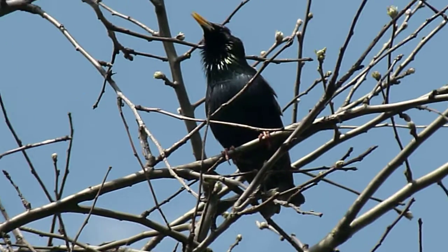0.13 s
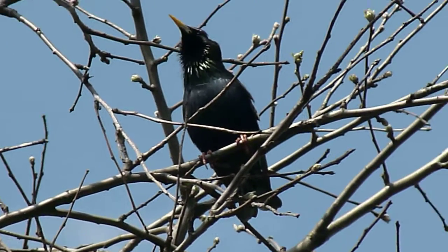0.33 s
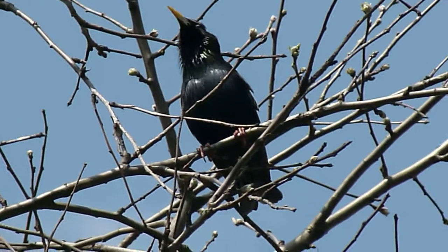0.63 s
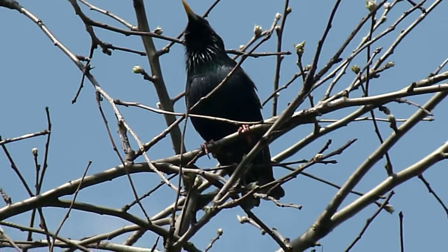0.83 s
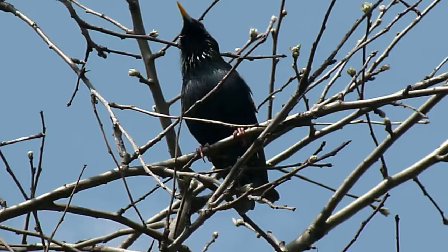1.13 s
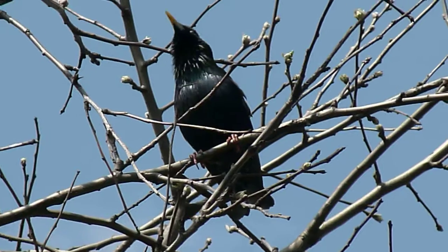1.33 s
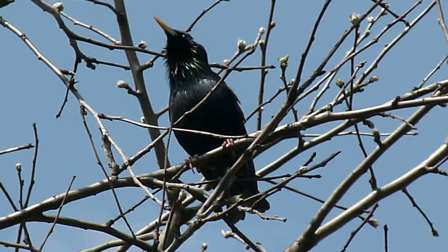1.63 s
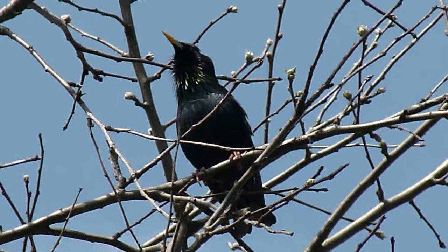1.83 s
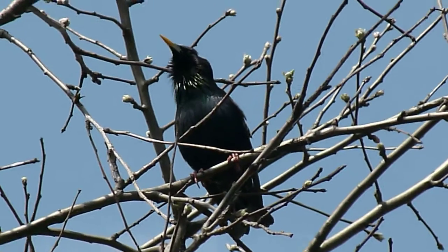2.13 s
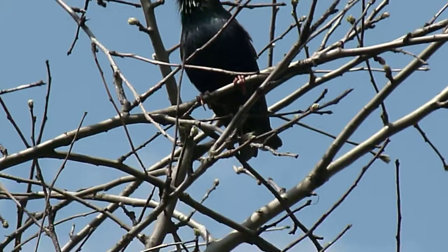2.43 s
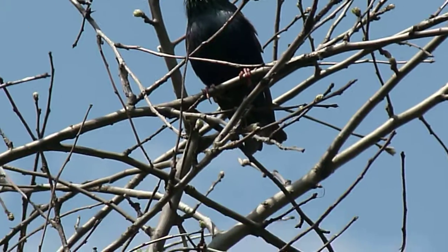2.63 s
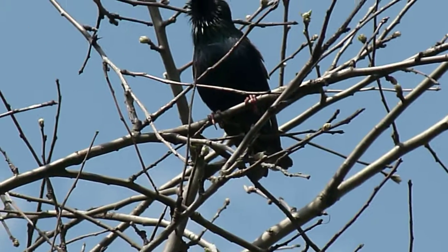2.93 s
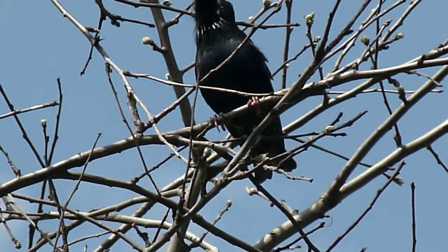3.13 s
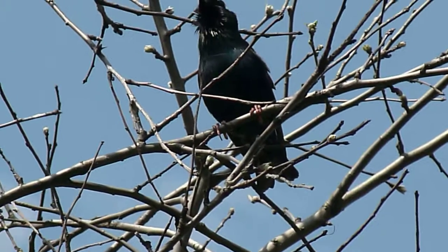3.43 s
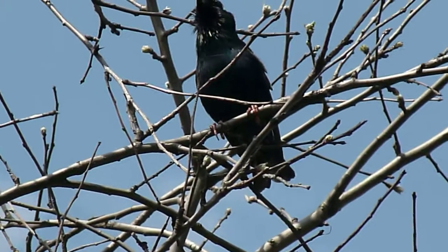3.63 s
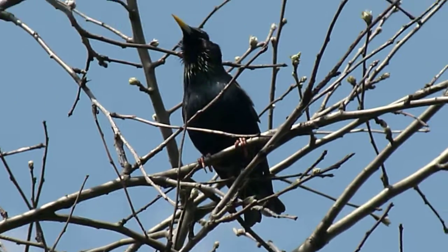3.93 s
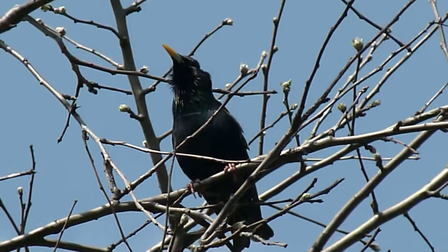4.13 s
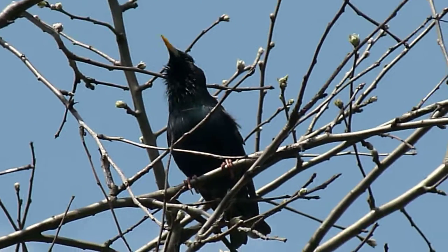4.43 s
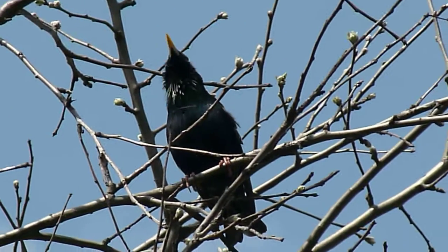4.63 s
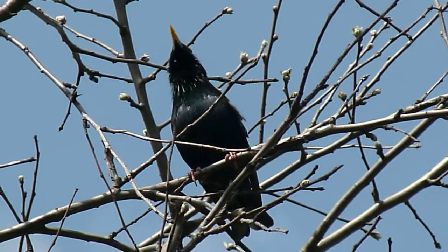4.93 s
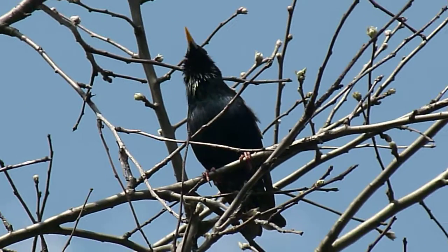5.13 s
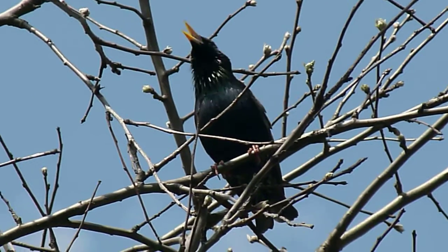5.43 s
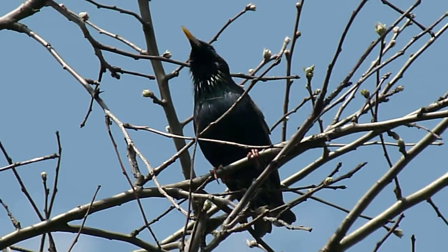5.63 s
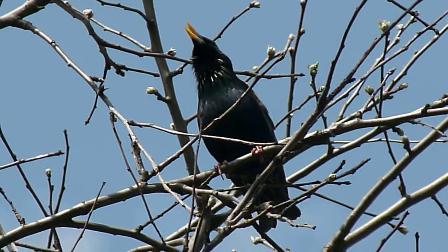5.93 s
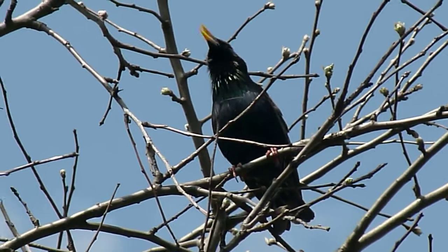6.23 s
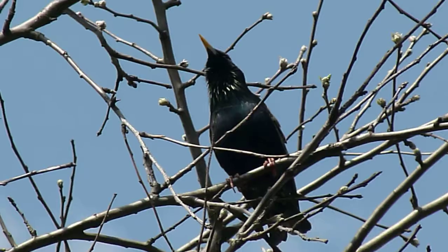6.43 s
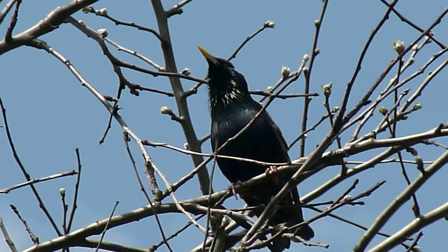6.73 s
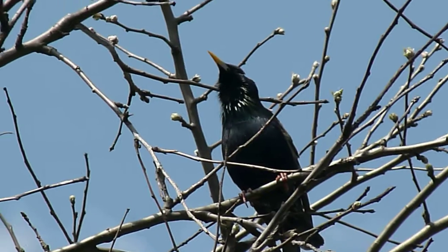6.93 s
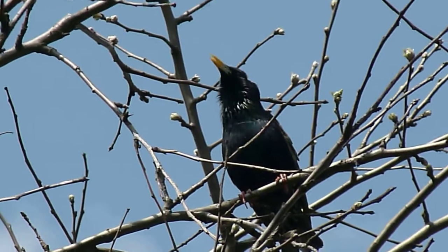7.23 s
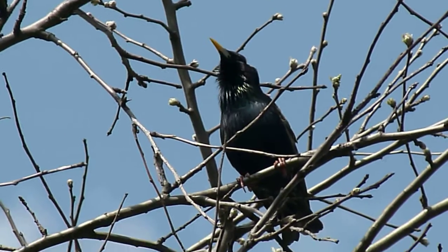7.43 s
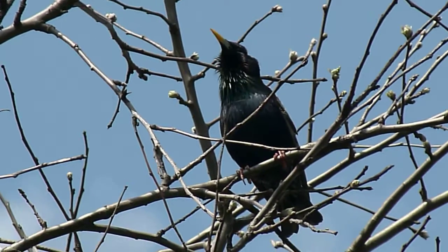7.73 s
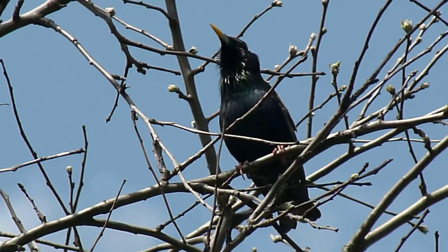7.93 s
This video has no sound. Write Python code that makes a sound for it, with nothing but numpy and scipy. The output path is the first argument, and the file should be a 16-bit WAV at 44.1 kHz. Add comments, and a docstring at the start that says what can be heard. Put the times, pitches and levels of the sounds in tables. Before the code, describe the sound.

Outdoors, a songbird rambles through steep whistles, bill snaps, squeaky warbles and soft rattles, lightly echoing above a low hum and far-off traffic.

```python
"""Far traffic murmurs and a machine hums, filtered noise and a drifting low tone; at once a whistle falls steeply.
It is a starling high in a bare tree, singing with both sides of its voice box: gliding sines make whistles
and trills of short chips, throat-filtered harmonics make reedy squawks, pulses and breath make buzzes.
Bill snaps and throat knocks are decaying tones; nearby walls and scattered houses and trees answer as noise tails.
The small recorder rolls off under 8 kHz and leaves a faint mirror image above."""
import sys
import numpy as np
from scipy import signal
from scipy.fft import rfft, irfft, next_fast_len
from scipy.io import wavfile
from scipy.ndimage import uniform_filter1d, map_coordinates

SR = 44100
rng = np.random.default_rng(int(sys.argv[2]) if len(sys.argv) > 2 else 0)


def wav_record(signal):
    """Record a signal, one row per channel, as 16-bit PCM in the file named by sys.argv[1]."""
    frames = np.transpose(np.atleast_2d(signal))
    bounded = np.clip(frames, -1, 1)
    # unit amplitude maps onto the largest positive 16-bit level
    quanta = np.round(bounded * 32767).astype(np.int16)
    wavfile.write(sys.argv[1], SR, quanta)


N = 357210
MIRROR_HZ = 8000  # edge of the recorder's band
LEAP_S = .014  # time of an upward leap in warbles and droops

# Reed motifs, the vocabulary of the motif list. Each row is a voice: throat resonance in Hz, its width in Hz,
# and a list of points: time from the motif's start in seconds, pitch in Hz, level in dB before the motif's own.
SQUAWK = [(3670, 2750, [(0, 929, -31.5), (.02, 1177, -34.5), (.039, 1406, -23)]),
          (6400, 770, [(0, 906, -20), (.012, 1050, -17.5), (.025, 1180, -20)])]
ZIP = [(3000, 7200, [(.004, 1018, -51), (.025, 1292, -39.5), (.047, 1343, -53)]),
       (5310, 1290, [(0, 886, -51), (.01, 1050, -25.5), (.023, 1385, -25)])]
HOOK = [(1460, 1120, [(0, 1402, -42.5), (.02, 1605, -49), (.036, 2092, -33), (.047, 2810, -40)]),
        (2450, 960, [(.004, 2050, -48.5), (.016, 2025, -41), (.034, 2960, -51)]),
        (2600, 700, [(.057, 2490, -50.5), (.064, 2460, -43.5), (.072, 2880, -52)])]
FLICK = [(5800, 1600, [(0, 1420, -48.5), (.015, 2110, -42.5)])]
PIPS = [(4500, 1500, [(0, 3210, -47), (.003, 4440, -34)]), (4500, 2200, [(.01, 4650, -27.5),
        (.015, 4850, -48)]), (4540, 1500, [(.02, 4820, -28.5), (.025, 4000, -36)]),
        (4350, 1300, [(.03, 4150, -33), (.036, 3000, -48)])]
CHACK = [(5060, 2470, [(0, 1561, -19), (.004, 2861, -17), (.013, 1703, -15.5), (.025, 914, -30.5)]),
         (4270, 2000, [(0, 3680, -8.5), (.002, 5078, -9.5), (.007, 3900, -7.5), (.014, 2238, -22.5),
         (.025, 1346, -39)])]
COO = [(1320, 740, [(0, 1208, -50), (.07, 1260, -45.5), (.095, 1290, -50), (.175, 1260, -48),
       (.2, 1333, -36), (.218, 1185, -38)]), (2750, 900, [(0, 623, -61), (.035, 633, -51),
       (.075, 625, -66)]), (2490, 530, [(.13, 648, -52), (.175, 627, -50), (.2, 638, -53)])]
RASP = [(2450, 1300, [(0, 502, -52.5), (.018, 519.5, -45.5), (.034, 510, -56.5)])]


def amp(db):
    """Decibels as an amplitude ratio."""
    return 10 ** (np.asarray(db) / 20)


def unit(x):
    """Normalize to a root-mean-square value of one."""
    return x / np.sqrt(np.mean(x ** 2) + 1e-20)


def along(points, hz):
    """Interpolate (Hz, value) points on a logarithmic frequency axis."""
    f, v = np.transpose(points)
    return np.interp(np.log(hz + 1), np.log(f + 1), v)


def wobble(n, rate):
    """A smooth random curve: a spline through random knots, rate of them a second."""
    knots = rng.standard_normal(int(n * rate / SR) + 4)
    return map_coordinates(knots, [np.arange(n) * rate / SR])


def filtered(x, response):
    """Linear filtering: multiply the spectrum of x by a response of frequency."""
    m = next_fast_len(N + SR // 2)
    return irfft(rfft(x, m) * response(np.fft.rfftfreq(m, 1 / SR)), m)[..., :N]


def add(track, s, sound):
    """Superposition: sum a sound into the track at s seconds."""
    part = track[round(s * SR):][:len(sound)]
    part += sound[:len(part)]


def traffic():
    """Broadband noise from many far sources: random patches in time and frequency, partly coherent channels."""
    # Each row: frequency in Hz, relative power density in dB.
    spectrum = [(20, -21), (60, -25), (118, -11.5), (456, -1), (543, -3.5), (896, 1), (1210, 1),
                (1480, -6.5), (4440, -9), (6800, -14), (7900, -27), (12000, -90)]
    # Each row: frequency in Hz, left-right correlation before the lean.
    likeness = [(40, 0.47), (250, 0.96), (900, 0.51), (5000, 0.054)]
    z = signal.stft(rng.standard_normal((2, N)), nperseg=512)[2]
    field = rng.standard_normal(z.shape[1:])
    field = uniform_filter1d(uniform_filter1d(field, 5, 0), 10, 1)
    pair = signal.istft(z * amp(2.64 * unit(field)), nperseg=512)[1][:, :N]

    def mid_side(hz):
        hollow_db = 5 / (1 + ((hz - 910) / 40) ** 2)
        turn = np.arccos(np.clip(along(likeness, hz), -1, 1)) / 2
        return amp(along(spectrum, hz) + hollow_db) * [np.cos(turn), np.sin(turn)]

    def lean(hz):
        return amp(-1.8 * np.exp(-np.log2((hz + 1) / 900) ** 2) * np.array([[1], [-1]]))

    mid, side = filtered(pair, mid_side)
    return amp(-49.5) * filtered(unit(np.array([mid + side, mid - side])), lean)


def machine_hum():
    """A periodic source: a wandering fundamental with second and third harmonics, slightly louder at the left."""
    # Each row: time in seconds, level in dB of the fundamental before a 4 dB lift and the channel gain.
    fundamental = [(0.0, -77.5), (0.99, -68), (1.33, -82), (1.58, -68), (4.11, -62), (5.8, -78),
                   (6.31, -70), (6.72, -86), (6.99, -71.5), (7.42, -73.5), (8.1, -74)]
    # Each row: time in seconds, level in dB of the harmonics before a random wander and the channel gain.
    harmonics = [(0.0, -81), (0.83, -69.5), (2.64, -82), (3.09, -64.5), (3.7, -61.5), (5.26, -75),
                 (7.9, -66.5)]
    t = np.arange(N) / SR
    phase = 2 * np.pi * np.cumsum(72.8 + .5 * wobble(N, 2.3)) / SR
    hum = amp(np.interp(t, *np.transpose(fundamental)) + 4.0) * np.sin(phase)
    overtone_gain = amp(np.interp(t, *np.transpose(harmonics)) + 2 * wobble(N, 6))
    hum = hum + overtone_gain * (.6 * np.sin(2 * phase) + np.sin(3 * phase + wobble(N, 9)))
    return hum * amp([[.7], [-.7]])  # dB, left and right


def glide(rows, fade):
    """Frequency modulation path: time, pitch and gain per sample; the pitch turns only at the rows."""
    s, hz, db = np.transpose(rows)
    t = np.arange(s[0] - fade / 2, s[-1] + fade / 2, 1 / SR)
    step = np.diff(hz) / np.diff(s)
    a, b = np.r_[step[0], step], np.r_[step, step[-1]]
    # the harmonic mean of neighbouring slopes keeps the cubic from overshooting
    slope = np.where(a * b > 0, 2 * a * b / (a + b + 1e-9), 0)
    k = np.clip(np.searchsorted(s, t) - 1, 0, len(s) - 2)
    h = np.diff(s)[k]
    u = np.clip((t - s[k]) / h, 0, 1)
    bend = (1 - u) * (slope[k] - step[k]) - u * (slope[k + 1] - step[k])
    pitch = hz[k] + h * u * (step[k] + (1 - u) * bend)
    edge = np.clip(np.minimum(t - t[0], t[-1] - t) / fade, 0, 1)
    return t, pitch, amp(np.interp(t, s, db)) * np.sin(np.pi / 2 * edge) ** 2


def whistle(track, rows, fade=.006, rough=.2, octave_db=-37, waver_hz=0):
    """One membrane as a near-pure oscillator: a sine with a weak octave, its size and phase shaken by roughness."""
    flutter_rate, sway_rate = 105, 19  # cycles a second
    t, hz, gain = glide(rows, fade)
    flutter = np.sin(2 * np.pi * flutter_rate * (t - t[0]))
    sway = np.sin(2 * np.pi * sway_rate * (t - t[0]))
    hz = hz + waver_hz * (flutter - sway)
    phase = 2 * np.pi * np.cumsum(hz) / SR + rough * wobble(len(t), 420)
    octave = amp(octave_db) * np.sin(2 * phase) * (2 * hz < MIRROR_HZ)
    add(track, max(t[0], 0), gain * (1 + rough * wobble(len(t), 330)) * (np.sin(phase) + octave))


def swoop(knee, lead, first_hz, first_db, db, tail, last_hz, second_db):
    """Two independent oscillators: a long fall steepens at a knee, just after which the second voice joins."""
    knee_hz, tail_loss_db = 4000, 6.5
    join_s, bend_s, outlasts_s = .0046, .025, .0089  # delays from the knee, then past the tail
    join_hz, bend_hz, end_hz, edge_db = 3350, 2590, 2000, 10.5
    upper = [(knee - lead * (1 - u), first_hz * (knee_hz / first_hz) ** u, first_db + u * (db - first_db))
             for u in np.arange(3) / 2]
    upper += [(knee + tail, last_hz, db - tail_loss_db)]
    lower = [(knee + join_s, join_hz, second_db - edge_db), (knee + bend_s, bend_hz, second_db),
             (knee + tail + outlasts_s, end_hz, second_db - edge_db)]
    return [upper, lower]


def swoops(track):
    """Downward frequency sweeps, each sung by both voices."""
    # Each row: time of the knee in seconds, lead-in in seconds, first pitch in Hz, first level in dB,
    # level at the knee in dB, tail in seconds, last pitch in Hz, level of the second voice in dB.
    swoop_rows = [(.2, 0.18, 7510, -44, -38.5, 0.035, 2540, -53),
                  (0.797, 0.11, 6270, -70, -39, 0.05, 2470, -39.5),
                  (1.481, 0.092, 6220, -70, -38.5, 0.055, 2450, -46.5),
                  (2.278, 0.091, 6040, -61, -38.5, 0.025, 2830, -40)]
    for row in swoop_rows:
        for voice in swoop(*row):
            whistle(track, voice)


def chip(track, s, hz, db, depth, climb):
    """A fast frequency sweep: a climb to the top, then a flattening fall; more climb makes both sides longer."""
    snap_s, climb_s, drop_s = .002, .009, .009
    slow = np.clip(climb, 0, 1) ** 2
    fall = drop_s * (0.51 + 0.62 * slow ** 0.24)
    foot_hz = hz * (1 - depth * (.3 + .35 * slow))
    arch = [(s - snap_s - climb_s * slow, foot_hz, db - 8 + 4 * slow), (s, hz, db - 1),
            (s + 0.344 * fall, hz * (1 - 0.401 * depth), db - 0.5),
            (s + fall, hz * (1 - 0.79 * depth), db - 15.5)]
    whistle(track, arch, fade=.0025, rough=.28, octave_db=-23)


def trills(track):
    """Rapid repetition of one gesture: evenly spaced chips, with small random shifts of time, pitch and level."""
    # Each row: first top in seconds, last top in seconds, number of chips, first and last top pitch in Hz,
    # first, second and last nominal level in dB, depth of the fall from 0 to 1, climb from 0 to 1.
    trill_rows = [(0.251, 0.38, 6, 4400, 3210, -37, -47.5, -40, 0.68, 0.52),
                  (0.497, 0.594, 5, 3920, 3690, -31.5, -32.5, -38.5, 0.76, 0.61),
                  (1.184, 1.278, 5, 4140, 3860, -32.5, -34, -39, 0.9, 0.38),
                  (1.557, 1.694, 7, 4830, 5050, -42, -43, -49.5, 0.47, 1),
                  (1.576, 1.693, 6, 3660, 3460, -51, -46.5, -45, 0.71, 1),
                  (1.837, 2.081, 9, 3640, 3510, -51.5, -47.5, -53, 0.5, 0.6),
                  (6.98, 7.031, 5, 3900, 4250, -40, -42.5, -42.5, 0.06, 0.16),
                  (7.039, 7.157, 5, 5780, 4660, -40.5, -44, -47.5, 0.3, 0.5),
                  (7.052, 7.143, 4, 6600, 6200, -45, -44.5, -46, 0.2, 0.5)]
    for first_s, last_s, count, first_hz, last_hz, first_db, second_db, last_db, depth, climb in trill_rows:
        count = round(count)
        times, tops = np.linspace(first_s, last_s, count), np.linspace(first_hz, last_hz, count)
        levels = np.r_[first_db, np.linspace(second_db, last_db, count - 1)]
        for s, hz, db in zip(times, tops, levels):
            s, hz, db = s + rng.normal(0, .0005), hz * rng.normal(1, .02), db + rng.normal(0, 1.1)
            chip(track, s, hz, db, depth, climb)


def drones(track):
    """Faint held tones whose pitch and level fluctuate at random about a mean."""
    # Each row: start in seconds, end in seconds, mean pitch in Hz, mean level in dB.
    drone_rows = [(0.303, .49, 1290, -53.5), (0.954, 1.16, 1270, -55), (2.68, 2.99, 1610, -53.5),
                  (3.357, 3.76, 1604, -55)]
    for start, end, hz, db in drone_rows:
        s = np.arange(start, end, .025)
        rows = np.transpose([s, rng.normal(hz, 18, len(s)), rng.normal(db, 2.5, len(s))])
        whistle(track, rows, fade=.012, rough=.35, octave_db=-30)


def reed(track, start, db, throat_hz, width_hz, rows):
    """Source and filter: a buzzing membrane's first nine harmonics, weighted by the throat resonance."""
    t, hz, gain = glide(rows, fade=.0034)
    k = np.arange(1, 10)[:, None]
    phase = 2 * np.pi * np.cumsum(hz) / SR + .13 * wobble(len(t), 600)  # shake in radians
    resonance_db = -6 * ((k * hz - throat_hz) / width_hz) ** 2
    weight = amp(resonance_db + rng.normal(0, 0.22, k.shape)) * (k * hz < MIRROR_HZ)
    tone = np.sum(weight * np.sin(k * phase + k * k * 0.81), axis=0)
    rough = (1 + .22 * wobble(len(t), 700)) * amp(2.2 * wobble(len(t), 45))
    add(track, start + t[0], amp(db) * gain * tone * rough)


def motifs(track):
    """Reedy figures by superposition: the voices of each motif are timed from a common start."""
    # Each row: start in seconds, motif, level in dB added to the motif's own.
    motif_rows = [(0.415, FLICK, 0), (1.092, FLICK, 5.5), (2.106, FLICK, 0.5), (2.357, RASP, -1.5),
                  (2.413, ZIP, -1.5), (3.017, RASP, 1), (3.074, ZIP, -2), (3.769, RASP, 1),
                  (3.826, SQUAWK, -3), (3.862, CHACK, -7), (4.125, HOOK, 3.5), (4.314, SQUAWK, -3.5),
                  (4.351, CHACK, -5), (4.646, HOOK, 2.5), (4.839, SQUAWK, -2.5), (4.878, CHACK, -4),
                  (5.185, HOOK, 2), (7.256, PIPS, 2.5), (7.504, PIPS, -2.5), (7.748, COO, 0),
                  (8.002, PIPS, 5)]
    for s, motif, db in motif_rows:
        for voice in motif:
            reed(track, s, db, *voice)


def slides(track):
    """Linear frequency sweeps: pitch moves in even steps from first to last."""
    # Each row: start in seconds, length in seconds, first and last pitch in Hz, first and last level in dB.
    slide_rows = [(0.4755, 0.007, 3850, 1780, -36, -39), (1.16, 0.013, 4100, 1650, -48.5, -34.5),
                  (0.916, 0.022, 4300, 3610, -58, -50.5), (7.001, 0.01, 6950, 5970, -55, -46.5),
                  (1.53, 0.011, 4410, 3880, -46, -39), (2.534, 0.07, 4700, 3570, -54, -43.5),
                  (2.595, 0.045, 3380, 2630, -54, -40.5), (3.206, 0.077, 4510, 3210, -41, -41),
                  (3.29, 0.028, 2930, 2430, -38.5, -41), (5.171, 0.014, 5500, 3300, -39.5, -42.5),
                  (5.856, 0.0075, 2950, 2780, -26, -26), (5.926, 0.025, 5900, 6250, -31, -38),
                  (7.577, 0.024, 3760, 6770, -47, -50), (8.08, .018, 4500, 6620, -48, -44)]
    for s, length, first_hz, last_hz, first_db, last_db in slide_rows:
        whistle(track, [(s, first_hz, first_db), (s + length, last_hz, last_db)])


def knocks():
    """Impulsive excitation with exponential decay: bright bill snaps of tones and noise, low ringing throat knocks."""
    # Bill snaps. Each row: time in seconds, nominal peak level in dB.
    snap_rows = [(0.668, -15), (1.3505, -15.5), (2.625, -34)]
    # Hollow throat knocks. Each row: time in seconds, nominal peak level in dB.
    tock_rows = [(2.171, -30.5), (2.187, -36), (2.482, -26), (3.1457, -26)]
    track, t = np.zeros(N), np.arange(SR // 50) / SR
    for s, db in snap_rows:
        tick = np.sin(2 * np.pi * 6600 * t) + 0.6 * np.sin(2 * np.pi * 4300 * t)
        tick += 0.21 * np.sin(2 * np.pi * 2200 * t) + 0.62 * rng.standard_normal(len(t))
        add(track, s, amp(db - 8.5 - 60 * t / 0.0087) * tick)  # falls 60 dB in 8.7 ms
    for s, db in tock_rows:
        add(track, s, amp(db - 60 * t / 0.021) * np.sin(2 * np.pi * 1850 * t))
    return track


def chips(track):
    """Fast frequency sweeps, single or in a loose rattle, each rising to one top and falling."""
    # Each row: time of the top in seconds, top pitch in Hz, nominal level in dB, depth of the fall from 0 to 1.
    chip_rows = [(5.679, 7120, -39, 0.4), (5.709, 7340, -36, 0.27), (6.145, 5400, -36, 0.86),
                 (6.171, 4670, -37.5, 0.4), (6.208, 4840, -41.5, 0.7), (.863, 4300, -34.5, .45),
                 (.891, 4460, -43, .4), (.943, 3440, -47, .4), (.967, 3260, -39, 0.54),
                 (.993, 3010, -39.5, .52), (1.019, 2940, -36.5, .5), (1.045, 2930, -36.5, .45),
                 (1.069, 3070, -39, 0.6)]
    for row in chip_rows:
        chip(track, *row, climb=.5)


def sag(start, end, first_hz, last_hz, first_db, last_db):
    """Exponential relaxation: pitch settles toward its last value like a spring going slack."""
    sink_s = 0.046  # time constant
    s = np.linspace(start, end, 6)
    hz = last_hz + (first_hz - last_hz) * np.exp(-(s - start) / sink_s)
    return np.transpose([s, hz, np.linspace(first_db, last_db, len(s))])


def held_sags(track):
    """Held tones under exponential relaxation, sinking fast and then slowly."""
    # Each row: start and end in seconds, first pitch and final target in Hz, first and last level in dB.
    sag_rows = [(1.743, 2.117, 1334, 1268, -41.5, -44.5)]
    for row in sag_rows:
        whistle(track, sag(*row))


def wheezes(track):
    """Frequency modulation of a sagging tone: a quick flutter and a slow sway make it wheezy."""
    # Each row: start and end in seconds, first pitch and final target in Hz, first and last level in dB.
    wheeze_rows = [(2.641, 2.987, 7360, 6690, -54.5, -62), (3.319, 3.729, 7300, 6540, -54.5, -66),
                   (3.477, 3.533, 4310, 4200, -47, -45), (7.042, 7.23, 4150, 4020, -56, -49)]
    for row in wheeze_rows:
        whistle(track, sag(*row), fade=.012, rough=.45, octave_db=-40, waver_hz=115)


def warble(waves):
    """Wide frequency modulation: a leap toward a first crest, then alternating troughs and crests."""
    s, hz, db, climb, crest_hz, crest_db = waves[0]
    rows = [(s - .013, 1.05 * hz, db - 7.5), (s, hz, db),
            (s + LEAP_S, .965 * crest_hz, crest_db + 6.5), (s + climb, crest_hz, crest_db)]
    for s, hz, db, climb, crest_hz, crest_db in waves[1:]:
        rows += [(s, hz, db), (s + climb, crest_hz, crest_db)]
    return rows + [(s + climb + .004, crest_hz, crest_db - 5.5)]


def warbles(track):
    """The upper voice as a continuous oscillator, its pitch swinging through each phrase."""
    # One list a phrase. Each row: time of a trough in seconds, its pitch in Hz, its level in dB,
    # climb in seconds, pitch of the next crest in Hz, its level in dB.
    phrases = [
        [(5.403, 4620, -44, 0.027, 8000, -37), (5.465, 6370, -30.5, .024, 8860, -33),
         (5.518, 5900, -27.5, 0.013, 7970, -21.5), (5.561, 6080, -30.5, 0.018, 6960, -26)],
        [(5.975, 4050, -34.5, 0.03, 7500, -35), (6.031, 5500, -36, .016, 7420, -31.5),
         (6.077, 6000, -32, .017, 7120, -27.5), (6.12, 6130, -34.5, 0.019, 6650, -40)],
        [(6.224, 5270, -40, 0.035, 7540, -36.5), (6.288, 6490, -23, .02, 7520, -30.5),
         (6.336, 6310, -25.5, 0.011, 7350, -28), (6.39, 6160, -32, 0.012, 6200, -53)],
    ]
    for waves in phrases:
        whistle(track, warble(waves))


def droop(s, low_hz, top_hz, db, hold, fall, last_hz, last_db, early):
    """A rise, plateau and two-stage fall of frequency: a quick slip, then a slower droop."""
    slip_from = s + LEAP_S + hold
    return [(s - .006, low_hz * 1.4, db - 12), (s, low_hz, db - 8), (s + LEAP_S, top_hz, db),
            (slip_from, .99 * top_hz, db),
            (slip_from + .02, top_hz + early * (last_hz - top_hz), db - 8.0),
            (slip_from + fall, last_hz, last_db)]


def droops(track):
    """The lower voice as a second oscillator: it leaps up, holds and droops."""
    # Each row: time of the leap in seconds, low pitch in Hz, top pitch in Hz, level in dB, hold in seconds,
    # droop in seconds, last pitch in Hz, last level in dB, share of the droop done in the first slip.
    droop_rows = [(5.407, 3330, 6250, -38, 0.014, 0.034, 5300, -40, 0.9),
                  (5.471, 5250, 6080, -37, 0.0091, 0.19, 3750, -62, 0.59),
                  (5.974, 2450, 4960, -36, 0.011, 0.086, 4350, -40, 0.31),
                  (6.226, 3740, 5600, -35, 0.028, 0.2, 4130, -54.5, .52)]
    for row in droop_rows:
        whistle(track, droop(*row))


def buzz(track, s, length, rate, hz, db):
    """Source and filter: uneven pulses and breath noise excite a wide throat resonance."""
    t = np.arange(length * SR) / SR
    cycles = rate * t + 0.13 * wobble(len(t), 150)
    pulses = 6.0 * np.abs(np.diff(np.floor(cycles), prepend=0))
    breath = (0.82 + 0.14 * (1 - cycles % 1) ** 3) * rng.standard_normal(len(t))
    band = signal.butter(2, [0.54 * hz, min(1.3 * hz, MIRROR_HZ)], "bandpass", fs=SR, output="sos")
    swell = np.abs(np.sin(np.pi * t / length)) ** 1.1
    add(track, s, amp(db) * unit(signal.sosfilt(band, pulses + breath)) * swell)


def buzzes(track):
    """Short pulse trains through a resonance, heard as rattles when slow and buzzes when fast."""
    # Each row: start in seconds, length in seconds, pulses a second, resonance in Hz, level in dB before the swell.
    buzz_rows = [(5.806, 0.064, 650, 2610, -40), (5.832, 0.049, 1600, 6040, -28),
                 (6.128, 0.043, 1560, 4570, -46), (6.698, 0.046, 190, 1160, -42.5),
                 (7.192, 0.045, 184, 1175, -41), (7.305, 0.024, 270, 1460, -43.5),
                 (7.443, 0.053, 230, 1150, -38.5), (7.647, 0.037, 310, 1320, -38)]
    for row in buzz_rows:
        buzz(track, *row)


def flurry(track):
    """Two oscillators: the lower notches between close humps and slumps between far ones; the upper has humps only."""
    # Each row: time of the top in seconds, lower pitch in Hz, its level in dB, upper pitch in Hz,
    # its level in dB, depth of the upper hump from 0 to 1.
    humps = [(5.851, 3500, -24.5, 5430, -20, .46), (5.878, 4600, -24.5, 7320, -22, 0.4),
             (5.888, 4310, -25.5, 6930, -18, .23), (5.9143, 5200, -24, 6700, -21, .15),
             (5.924, 4780, -25.5, 6500, -25, 0.1)]
    hump_s, upper_hump_s, slump_s, valley_s = .005, .0048, .008, .009
    notch, slump, valley_hz = .73, .62, 1620  # notch and slump are shares of the top pitch
    first_s, first_hz, first_db = humps[0][:3]
    lower, upper = [(first_s - hump_s, notch * first_hz, first_db - 6)], []
    next_tops = [row[0] for row in humps[1:]] + [np.inf]
    for (s, hz, db, high_hz, high_db, depth), ahead in zip(humps, next_tops):
        close = ahead - s < 3 * hump_s
        after = (s + hump_s, notch * hz, db + 0.5) if close else (s + slump_s, slump * hz, db - 8)
        lower += [(s, hz, db), after]
        if not close and ahead < np.inf:
            lower += [(ahead - valley_s, valley_hz, db - 15.5)]
        foot_hz = high_hz * (1 - depth)
        upper += [[(s - upper_hump_s, foot_hz, high_db - 2), (s, high_hz, high_db),
                   (s + upper_hump_s, foot_hz, high_db - 3)]]
    for rows in [lower] + upper:
        whistle(track, rows, fade=.003, rough=.2, octave_db=-24)


def duet(track):
    """Two soft independent oscillators whose glides overlap."""
    # One list a voice. Each row: time in seconds, pitch in Hz, level in dB.
    voices = [
        [(6.704, 4400, -49.5), (6.733, 4450, -47), (6.747, 5900, -56), (6.79, 6050, -56), (6.87, 5700, -51),
         (6.965, 5730, -64)],
        [(6.786, 4900, -54), (6.815, 4780, -49), (6.84, 4400, -49.5), (6.965, 4120, -51)],
    ]
    for rows in voices:
        whistle(track, rows)


def song():
    """Superposition of all that comes from the voice box."""
    track = np.zeros(N)
    for part in (swoops, trills, drones, motifs, slides, chips, held_sags, wheezes,
                 warbles, droops, buzzes, flurry, duet):
        part(track)
    return track


def walls(x):
    """Early reflections: rough surfaces return short, dull, smeared copies, partly unlike in the two channels."""
    # Nearby surfaces that answer singly. Each row: delay in seconds, level in dB before dulling.
    surfaces = [(.009, -11.5), (.063, -19.5), (.111, -23.5), (.152, -29)]
    smear_s = .006  # time for a 20 dB fall
    t, answer = np.arange(SR // 50) / SR, np.zeros((2, SR // 5))
    for late, db in surfaces:
        burst = [[1, 0.37], [1, -0.43]] @ rng.standard_normal((2, len(t)))
        burst = burst * amp(-20 * t / smear_s)
        answer[:, round(late * SR):][:, :len(t)] += amp(db) * burst / np.linalg.norm(burst[0])
    dull = filtered(x, lambda hz: amp(-6 * np.log2((hz + 60) / 4300) ** 2))
    return signal.fftconvolve(dull[None], answer, axes=1)[:, :N]


def echoes(x):
    """Diffuse reverberation from walls and trees: decaying noise tails, drawn anew every quarter second."""
    # Each row: frequency in Hz, time in seconds for a 60 dB decay.
    decay = [(1000, 0.62), (2500, 0.78), (4500, 0.9), (7500, 0.34)]
    lumps_db = 2.2  # unevenness of the tail
    out, hop, delay = np.zeros((2, N + 2 * SR)), SR // 4, 500  # samples
    for i in range(0, N, hop):
        hz, t, z = signal.stft(rng.standard_normal((2, SR * 3 // 4)), SR, nperseg=256)
        fade_db = -60 * t / along(decay, hz)[:, None] + lumps_db * wobble(len(t), SR / 3)
        colour_db = -3.5 * np.log2((hz[:, None] + 60) / 4600) ** 2
        tail = signal.istft(z * amp(fade_db) * amp(colour_db), SR, nperseg=256)[1]
        tail[1] = 1.02 * tail[0] + 0.64 * tail[1]  # channels partly alike
        wet = signal.fftconvolve(x[None, i:i + hop], tail / np.linalg.norm(tail[0]), axes=1)
        out[:, i + delay:i + delay + wet.shape[1]] += wet
    return out[:, :N]


def scene():
    """Direct sound, reflections and background sum linearly at two channels."""
    # Each row: frequency in Hz, left minus right level of the direct sound in dB.
    balance = [(60, 18), (210, -0.5), (700, -1), (2410, -6), (8260, 5)]
    # so small a body sends out no bass
    bird = filtered(song() + knocks(), lambda hz: hz ** 4 / (hz ** 4 + 600 ** 4))
    sides = np.array([[.5], [-.5]])
    direct = filtered(bird, lambda hz: amp(sides * along(balance, hz)))
    return direct + walls(bird) + amp(-19) * echoes(bird) + traffic() + machine_hum()


def record(dry):
    """Aliasing: after a roll-off under 8 kHz, sampling at twice that rate leaves a weak mirror image above it."""
    top_hz = 9300
    kept = filtered(dry, lambda hz: amp(-40 * np.clip((hz - 7000) / (MIRROR_HZ - 7000), 0, 3) ** 2.96))
    mirror = 2 * kept * np.cos(2 * np.pi * 2 * MIRROR_HZ * np.arange(N) / SR)
    image = filtered(mirror, lambda hz: (hz > MIRROR_HZ) * amp(-27 - 20 * ((hz - MIRROR_HZ) / 1000) ** 2))
    return filtered(kept + image, lambda hz: hz < top_hz)


dry = scene()
out = record(dry)
wav_record(out)
```